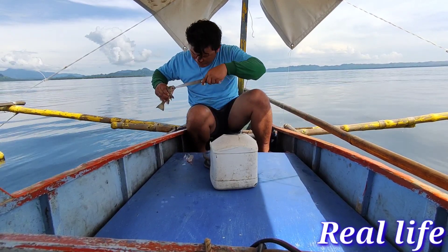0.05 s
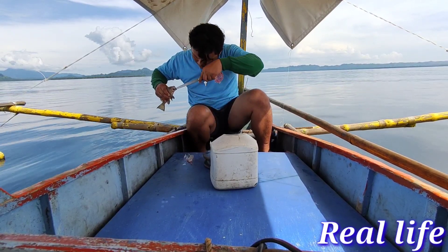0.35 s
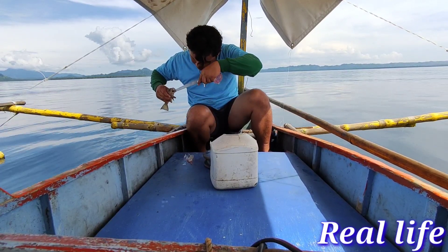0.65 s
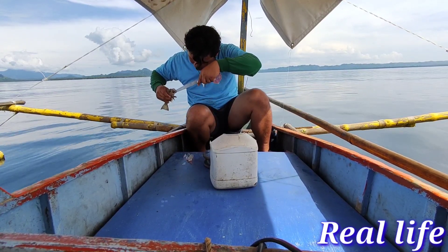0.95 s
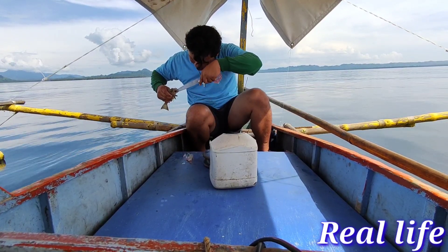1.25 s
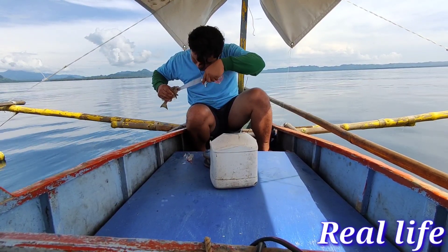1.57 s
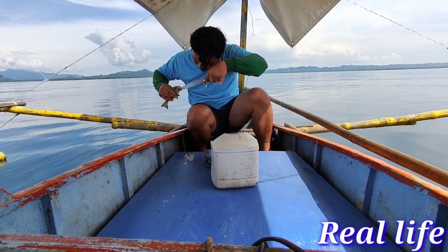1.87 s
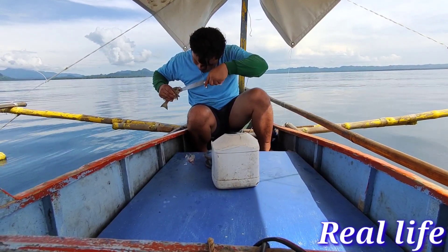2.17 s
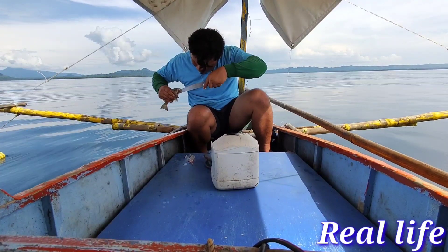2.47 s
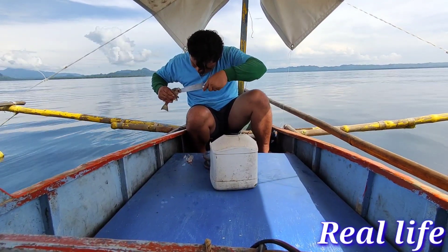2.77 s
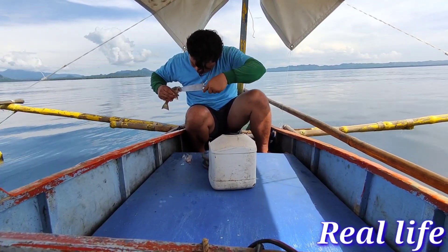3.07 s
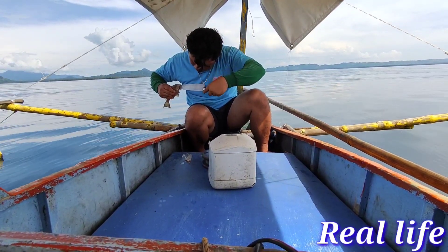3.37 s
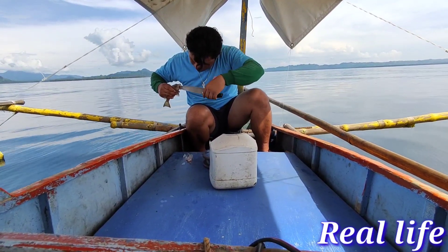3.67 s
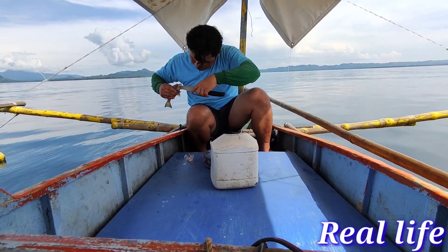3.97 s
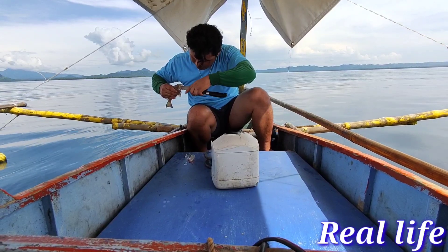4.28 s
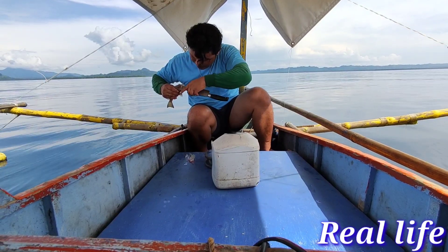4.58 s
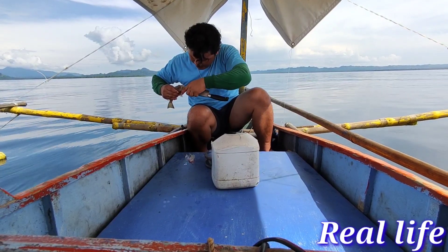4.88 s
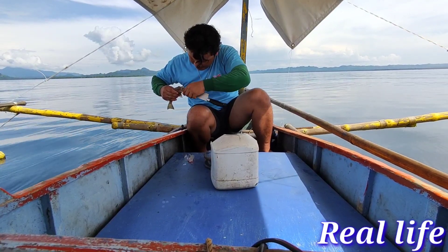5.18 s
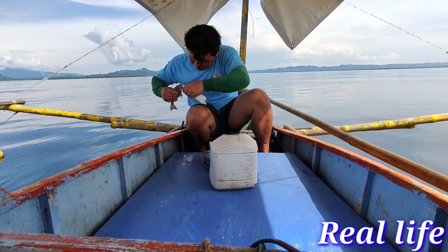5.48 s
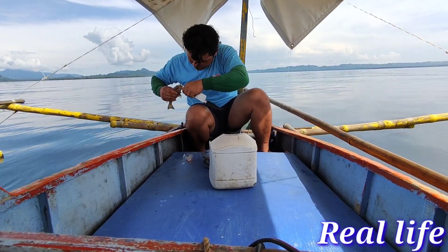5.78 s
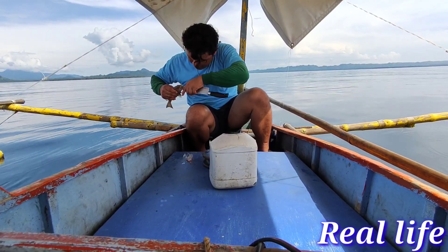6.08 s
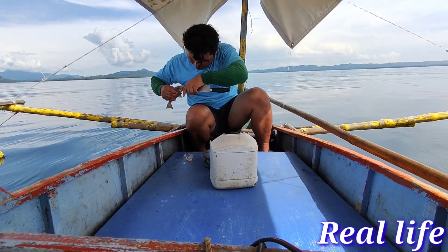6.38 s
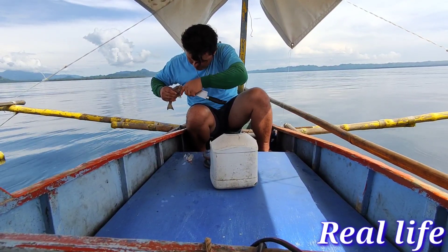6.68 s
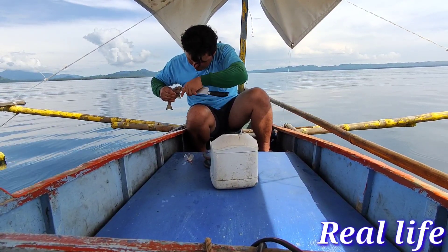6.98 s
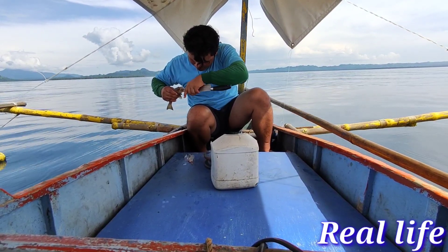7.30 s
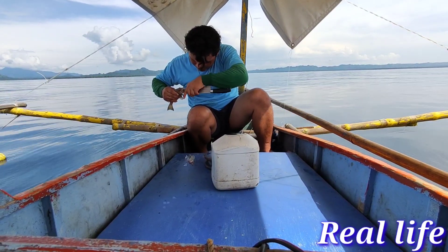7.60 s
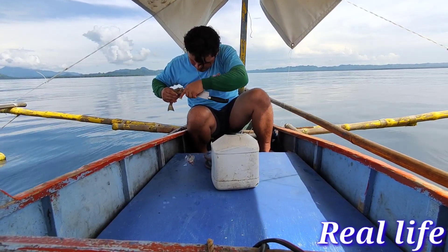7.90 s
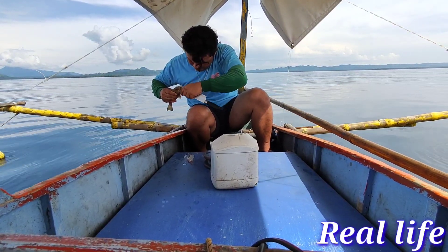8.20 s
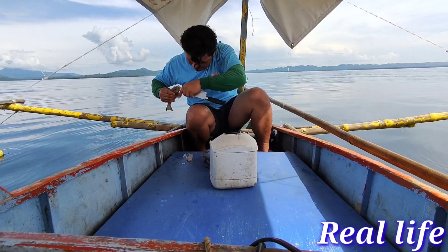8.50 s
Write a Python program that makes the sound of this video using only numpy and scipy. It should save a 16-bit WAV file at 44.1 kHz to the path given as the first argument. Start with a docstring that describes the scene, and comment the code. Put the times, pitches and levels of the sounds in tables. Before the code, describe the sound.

Light steel clicks and short, crackly scrapes come from a knife prising a hook out of a fish, with faint wet rubs of skin. Underneath, ripples pat a wooden hull and trapped air gurgles. A few dull wooden knocks sound early, then come thick and uneven in the second half, following the sharpest click. The microphone sits in the small boat, drifting on calm open water.

```python
"""Faint scratches and clicks of steel over lapping water: a fisherman prises a hook from a small fish
with a knife, on an outrigger boat adrift in a calm. The blade slips and drags on bone, rubs wet skin
and rings with the hook. Loose wood knocks dully on the hull and rings its planks. Ripples lap under
the boards; trapped air gurgles and wavelets break into tiny bubbles."""
import sys
import numpy as np
from scipy import signal
from scipy.fft import rfft, irfft, next_fast_len
from scipy.io import wavfile

SR = 44100
rng = np.random.default_rng(int(sys.argv[2]) if len(sys.argv) > 2 else 0)


def file_out(sig):
    """Save sig as 16-bit WAV at sys.argv[1]."""
    # one column per channel
    cols = np.atleast_2d(sig).T
    # limit, then scale
    lim = np.clip(cols, -1, 1)
    pcm = np.round(lim * 32767).astype(np.int16)
    wavfile.write(sys.argv[1], SR, pcm)


N = 381465
T = np.arange(N) / SR

# Table levels are relative. Spectra: (frequency [Hz], density [dB]).
FAR_HISS_SPECTRUM = [(300, -9.5), (700, 7.5), (1500, 3), (2500, -2), (4500, -3.5), (6500, -12), (7600, -27),
                     (9500, -13.5), (12000, -8), (14500, -8), (16000, -22.5)]  # far water and air
LAP_SPECTRUM = [(25, -38), (45, -18), (70, 1.5), (100, 4), (135, 9), (190, 0), (225, 0.5), (300, 1),
                (420, -7.5), (520, -16), (900, -25), (2000, -39.5)]  # ripples on the hull
HULL_SPECTRUM = [(60, -28), (135, 5), (190, -14), (260, 6), (500, 7.5), (1100, 2), (1700, 1.5),
                 (2000, -4.5), (2800, -13), (4500, -12)]  # dense, fast-dying part of the hull's ring
STEEL_SPECTRUM = [(2000, -32), (7200, -42), (8000, -8.5), (9600, 0), (10300, -10.5), (11500, 0.5),
                  (13700, -6), (15000, -13), (15600, -40)]  # hiss of steel
BONE_SPECTRUM = [(500, 5), (1500, -2), (2300, 1), (3900, -2.5), (4300, 2), (4800, -2.5), (6500, 0),
                 (7100, -6), (12000, -7)]  # cracking bone
# stereo width: (frequency [Hz], side minus mid [dB])
STEREO_WIDTH = [(30, 3), (70, -5.5), (140, -10), (280, -7.5), (550, -1.5), (1100, 0), (2200, 0)]
# ripple strength under the boards: (time [s], level [dB])
LAPPING = [(0.0, -69), (2.9, -72.5), (3.25, -62), (4.7, -63), (5.35, -66), (5.7, -43.5), (6.1, -62),
           (6.5, -61.5), (7.0, -56), (7.3, -60), (7.68, -51), (7.88, -63), (8.05, -49), (8.17, -66),
           (8.65, -50.5)]
# hull cavity: (frequency [Hz], bandwidth [Hz], level [dB])
HOLLOW_MODES = [(137.3, 5.1, -5.5), (190.4, 6.4, 3.5), (265, 26.5, -8), (305, 4.8, 2), (423.3, 3.55, -3.5)]
# breaking wavelets: (time [s], level [dB], centre [Hz])
PLIPS = [(0.757, -58.5, 817), (1.095, -61.5, 1000), (4.455, -61, 940)]
# air pockets: (time [s], level [dB], start pitch [Hz], glide [octaves/s], t60 [s])
GULPS = [(0.608, -37, 304, 1.5, 0.24), (0.619, -45.5, 106.5, 1.5, 0.47), (1.734, -44, 779, 0.5, 0.064),
         (2.15, -40.5, 124, -17, 0.13), (5.877, -36.5, 740, 41, 0.054)]
# hull planks: (frequency [Hz], level [dB], t60 [s])
HULL_MODES = [(259, 5.5, 0.089), (293, 0, 0.13), (397, -4.5, 0.19), (467.2, -5, 0.12), (590, -7, 0.083),
              (668, -18, 0.15), (783.8, -3, 0.12), (859, -21, 0.17), (1014, -13, 0.17), (1085, -3.5, 0.11),
              (1180, -9.5, 0.05), (1255, -16.5, 0.038), (1410, -16.5, 0.12), (1456, -7, 0.034),
              (1565, -5, 0.091), (1717, -7.5, 0.1), (1783, -16, 0.11)]
# loose wood on the hull, harder = higher corner: (time [s], level [dB], corner [Hz])
KNOCKS = [(0.602, -48.5, 1340), (1.731, -41, 500), (3.028, -38.5, 905), (3.109, -47.5, 720),
          (3.168, -53.5, 540), (3.258, -51.5, 398), (3.354, -39.5, 1320), (5.432, -42.5, 960),
          (5.575, -29, 2500), (5.641, -40, 870), (5.679, -43.5, 1610), (5.711, -50.5, 680),
          (5.777, -46.5, 890), (5.93, -47.5, 427), (6.003, -48.5, 484), (6.017, -41.5, 427),
          (6.035, -43, 1800), (6.056, -46, 610), (6.193, -31.5, 1820), (6.339, -44, 850), (6.857, -41, 700),
          (6.913, -44, 706), (6.963, -50.5, 1050), (7.106, -41.5, 786), (7.387, -52.5, 600),
          (7.414, -39.5, 1150), (7.528, -39.5, 1380), (7.584, -44, 790), (7.612, -45.5, 1060),
          (7.637, -39, 1530), (7.67, -49, 680), (7.71, -49.5, 670), (7.795, -50.5, 560), (7.928, -48, 940),
          (7.956, -45, 1060), (8.012, -43.5, 720), (8.059, -43.5, 900), (8.227, -47.5, 490),
          (8.304, -45, 750), (8.333, -35, 1820), (8.424, -47.5, 380), (8.596, -37, 900)]
# high ring of blade and hook: (frequency [Hz], bandwidth [Hz], level [dB])
STEEL_MODES = [(9450, 140, -4.5), (11040, 300, 0), (11580, 150, 1), (12050, 150, -9), (12140, 160, -9.5),
               (12700, 130, -1), (14800, 130, -3)]
# low ring of the blade: (frequency [Hz], level [dB], t60 [s])
BLADE_MODES = [(2032, -6.5, 0.048), (4260, -1, 0.05)]
# pan of the knife: (frequency [Hz], left minus right [dB])
STEEL_BALANCE = [(5000, 0), (8500, 2), (9600, 10.5), (10900, -10), (13100, -12.5), (14500, 4)]
# wet skin on steel, plus a short broad rustle at 8.24 s: (time [s], level [dB], length [s], centre [Hz],
# bandwidth [Hz])
RUBS = [(0.541, -71, 0.015, 4960, 890), (3.241, -70, 0.013, 2960, 400), (3.8, -67, 0.035, 2590, 600),
        (3.936, -68.5, 0.046, 2570, 600), (4.354, -66, 0.14, 4260, 2620), (4.677, -73.5, 0.16, 2800, 900),
        (5.914, -61, 0.008, 4100, 900), (6.357, -83, 0.13, 3600, 2000), (6.515, -77.5, 0.22, 3880, 2000),
        (8.163, -67, 0.09, 4730, 2100), (8.243, -62, 0.01, 1970, 2000), (8.26, -66, 0.032, 4200, 700)]
# blade drags: (time [s], level [dB], length [s], bone rasp [dB])
SCRATCHES = [(0.136, -58.5, 0.11, 2), (0.663, -57.5, 0.065, 1), (1.37, -60.5, 0.062, 3),
             (2.128, -54.5, 0.061, 0), (2.367, -62, 0.14, 0), (3.792, -42, 0.028, -1),
             (3.929, -41, 0.042, -4.5), (4.038, -55, 0.029, 2), (4.2, -49, 0.03, -1.5),
             (4.564, -50, 0.019, -1), (4.666, -52.5, 0.1, -8), (4.949, -58.5, 0.08, -4),
             (5.541, -56, 0.071, 4), (6.159, -57, 0.094, 5), (6.732, -57.5, 0.029, -3),
             (7.034, -55.5, 0.084, 2), (7.533, -64, 0.14, -5), (7.751, -57.5, 0.11, 5),
             (8.301, -59, 0.045, 12), (8.559, -58, 0.056, 5)]
# steel slipping off bone and hook: (time [s], level [dB], bone crack [dB])
CLICKS = [(0.223, -44.5, -12), (0.29, -52, 4), (0.787, -49, -1), (2.132, -54.5, 6), (2.284, -42, -5),
          (2.416, -51.5, -8), (2.601, -48.5, 2.5), (3.341, -44, -2.5), (3.608, -51.5, 3.5),
          (3.812, -45, -1), (3.933, -43, -4), (3.968, -44, 1), (4.066, -40.5, -6.5), (4.219, -43.5, -6),
          (4.354, -40, -11), (4.572, -46, 1), (4.673, -36.5, -8.5), (4.683, -51, -19), (4.709, -45, -8),
          (4.774, -32.5, -6), (4.792, -44, -2), (5.42, -42.5, 4), (5.523, -27.5, -1.5), (6.296, -48.5, 3),
          (6.765, -55, -1), (7.114, -50.5, -5), (7.79, -44.5, -3), (7.898, -46, -2), (8.293, -34, -0.5)]


def from_db(db):
    """Decibels to gain."""
    return 10 ** (np.asarray(db) / 20)


def unit_rms(x):
    """Scale to unit power."""
    return x / np.sqrt(np.mean(x ** 2) + 1e-20)


def tint(x, points):
    """Filter by a curve of (frequency [Hz], gain [dB])."""
    hz, db = np.transpose(points)
    size = next_fast_len(x.shape[-1])
    bins_hz = np.maximum(np.fft.rfftfreq(size, 1 / SR), 1)
    gain = from_db(np.interp(np.log(bins_hz), np.log(hz), db))
    return irfft(rfft(x, size) * gain, size)[..., :x.shape[-1]]


def butter(x, order, corner_hz, kind="low"):
    """Butterworth filter."""
    return signal.sosfilt(signal.butter(order, corner_hz, kind, fs=SR, output="sos"), x)


def stereo_noise(size=N):
    """Near-white noise, narrow in the upper bass, uncorrelated in the treble."""
    mid, side = rng.standard_normal((2, size))
    return unit_rms(mid + tint(side, STEREO_WIDTH) * np.array([[1], [-1]]))


def drift(rate_hz, size=N):
    """Smooth random curve, unit RMS."""
    steps = rng.standard_normal(size // 8)
    return unit_rms(np.interp(T[:size] * rate_hz, np.arange(len(steps)), steps))


def resonate(x, modes):
    """Parallel resonators: (frequency [Hz], bandwidth [Hz], level [dB])."""
    out = 0
    for hz, width_hz, db in modes:
        r = np.exp(-np.pi * width_hz / SR)
        feedback = [1, -2 * r * np.cos(2 * np.pi * hz / SR), r * r]
        out = out + from_db(db) * (1 - r * r) / 2 * signal.lfilter([1, 0, -1], feedback, x)
    return out


def band(x, hz, width_hz):
    """Two equal resonators in series, unit RMS."""
    mode = [(hz, width_hz, 0)]
    return unit_rms(resonate(resonate(x, mode), mode))


def uneven(x, spread_db=4.5, spacing_hz=210):
    """Random resonances of one contact spot."""
    hz = np.arange(1, 100) * spacing_hz
    db = spread_db * np.clip(rng.standard_normal(len(hz)), -2, 2)
    return tint(x, np.transpose([hz, db])) / np.sqrt(np.mean(from_db(2 * db)))


def add(out, time_s, sound):
    """Mix in at time_s."""
    at = int(np.clip(round(time_s * SR), 0, N - 1))
    out[..., at:at + sound.shape[-1]] += sound[..., :N - at]


def water(wash_db=-59.0, hollow_db=-61.5, hiss_db=-71.0, follow=0.1, slosh_hz=480):
    """Ripples pat the hull, hum in its hollow and slosh the planks into ringing, over a far hiss."""
    lapping_db = np.interp(T, *np.transpose(LAPPING))
    wash = unit_rms(tint(stereo_noise(), LAP_SPECTRUM) * from_db(1.5 * drift(25)))
    hollow = unit_rms(resonate(stereo_noise() * from_db(1.5 * drift(30)), HOLLOW_MODES))
    slosh = butter(stereo_noise() * from_db(3.0 * drift(45)), 2, slosh_hz)
    plank_modes = [(hz, np.log(1000) / (np.pi * t60_s), db) for hz, db, t60_s in HULL_MODES]
    planks = unit_rms(resonate(slosh, plank_modes))
    swell = from_db(follow * (lapping_db - lapping_db.mean()))
    ripples = swell * (from_db(wash_db) * wash + from_db(hollow_db) * hollow)
    hiss = unit_rms(tint(stereo_noise(), FAR_HISS_SPECTRUM))
    return ripples + from_db(lapping_db) * planks + from_db(hiss_db) * hiss


def plips(count=7, spread_s=0.026, spread_octaves=0.39, t60_cycles=16.0, rise_per_s=3.8):
    """Wavelets break into tiny bubbles, each ringing briefly with rising pitch."""
    out, t = np.zeros(N), T[:SR // 10]
    for time_s, db, centre_hz in PLIPS:
        for lag, detune in zip(rng.random(count), rng.standard_normal(count)):
            hz = centre_hz * 2 ** (spread_octaves * detune)
            chirp = np.sin(2 * np.pi * hz * t * (1 + rise_per_s * t / 2))
            add(out, time_s + spread_s * lag, from_db(db - 60 * t * hz / t60_cycles) * chirp)
    return out


def gulps(glide_s=0.035, rise_s=0.0049, rough_db=3.5, wobble_octaves=0.069):
    """Trapped air pockets ring unsteadily and glide in pitch."""
    out, t = np.zeros(N), T[:SR // 4]
    for time_s, db, start_hz, octaves_per_s, t60_s in GULPS:
        unrest = drift(138.4)[:len(t)]
        hz = start_hz * 2 ** (octaves_per_s * np.minimum(t, glide_s) + wobble_octaves * unrest)
        envelope = from_db(db + rough_db * unrest - 60 * t / t60_s) * (1 - np.exp(-(t / rise_s) ** 2))
        add(out, time_s, envelope * np.sin(2 * np.pi * np.cumsum(hz) / SR))
    return out


def plank_rings(t, rise_cycles=2.58, width_db=-8.0, right_lead_s=0.00006, low_cut_hz=195):
    """Bending waves, highs first, lows swelling after; axes (side, mode, sample)."""
    hz, db, t60_s = np.transpose(HULL_MODES)[:, :, None]
    rise_s = rise_cycles / hz
    envelope = (1 - np.exp(-(t / rise_s) ** 4)) * from_db(db - 60 * np.maximum(t - rise_s, 0) / t60_s)
    skew_rad = np.arctan(from_db(width_db + np.interp(hz, *np.transpose(STEREO_WIDTH))))
    sign = np.where(np.arange(len(hz)) % 2, -1, 1)[:, None]
    phase_rad = [2 * np.pi * hz * (t - side * right_lead_s / 2) - side * sign * skew_rad
                 for side in (1, -1)]
    # small planks radiate little below their lowest mode
    return butter(sign * envelope * np.sin(phase_rad), 2, low_cut_hz, "high")


def hull_knocks(rise_s=0.00035, hold_s=0.014, dense_t60_s=0.09, tail_db=-32, tail_t60_s=0.34,
                vary_db=2.0, hard_hz=1700, edge_db=-27, edge_t60_s=0.092):
    """Loose wood rings the hull; harder contacts are brighter, with a short, splashy edge."""
    out, t = np.zeros((2, N)), T[:SR // 3]
    rings = plank_rings(t)
    # echoes between the boat's sides sustain the dense ring for hold_s
    held = from_db(-60 * np.maximum(t - hold_s, 0) / dense_t60_s)
    tail = from_db(tail_db - 60 * t / tail_t60_s)
    dense_envelope = (1 - np.exp(-(t / rise_s) ** 2)) * (held + tail)
    for time_s, db, corner_hz in KNOCKS:
        mode_gains = from_db(vary_db * rng.standard_normal(len(HULL_MODES)))
        dense = unit_rms(tint(stereo_noise(len(t)), HULL_SPECTRUM)) * dense_envelope
        body = butter(mode_gains @ rings + dense, 3, corner_hz)
        edge = band(uneven(stereo_noise(len(t))), hz=3400, width_hz=2200)
        edge *= from_db(edge_db - 60 * t / edge_t60_s) * (corner_hz / hard_hz) ** 0.91
        add(out, time_s, from_db(db) * (body + edge))
    return out


def fingers(level_db=-81, bone_db=-14.0, patchy_db=7.5):
    """Restless grip on the fish: faint, uneven crackle."""
    grit = tint(stereo_noise(), STEEL_SPECTRUM) + from_db(bone_db) * tint(stereo_noise(), BONE_SPECTRUM)
    patches = from_db(patchy_db * (np.tanh(drift(22)) + 2 * np.tanh(drift(260))))
    return from_db(level_db) * unit_rms(grit * patches)


def stroke(length_s, ramp_s):
    """Envelope of one drag, ramped at both ends."""
    t = T[:SR // 3]
    return np.clip(t / ramp_s, 0, 1) * np.clip((length_s + ramp_s - t) / ramp_s, 0, 1)


def sliding_noise(size, shift_hz=30):
    """Friction whose resonances shift as the contact slides between spots."""
    mix_rad = np.pi * drift(shift_hz, size) / 2
    return np.cos(mix_rad) * uneven(stereo_noise(size)) + np.sin(mix_rad) * uneven(stereo_noise(size))


def stick_slip(size, rate_hz, spread_db=4.0, slip_s=0.0012, smooth_share=0.22):
    """Power of a drag that catches at random and lets go in tiny bursts; mean 1."""
    jerks = (rng.random(size) < rate_hz / SR) * from_db(2 * spread_db * np.tanh(rng.standard_normal(size)))
    power = signal.lfilter([1], [1, -np.exp(-1 / (slip_s * SR))], jerks + 1e-18)
    return smooth_share + (1 - smooth_share) * power / power.mean()


def skin_rubs(blade_db=-6.5, ease_db=8.5):
    """Wet skin on steel: a gritty, half-pitched rasp that eases off; the blade sings faintly along."""
    out = np.zeros((2, N))
    for time_s, db, length_s, hz, width_hz in RUBS:
        envelope = stroke(length_s, ramp_s=0.0023)
        size = len(envelope)
        envelope *= from_db(ease_db * (0.5 - np.minimum(T[:size] / length_s, 2)))
        envelope *= np.sqrt(stick_slip(size, rate_hz=600))
        friction = sliding_noise(size)
        blade = from_db(blade_db) * unit_rms(resonate(friction, STEEL_MODES))
        add(out, time_s, from_db(db) * envelope * (band(friction, hz, width_hz) + blade))
    return out


def scattered_friction(power, echo_db=-2.5, echo_t60_s=0.16):
    """Friction of a given power plus short scatter off the deck."""
    fade = from_db(-120 / (echo_t60_s * SR))
    echo_power = from_db(2 * echo_db) * signal.lfilter([1 - fade], [1, -fade], power + 1e-18)
    return sliding_noise(len(power)) * np.sqrt(power + echo_power)


def bite(power, crack_db, ring_db=2.0, bone_db=-5.5):
    """One contact of the edge: steel hisses and rings, bone rasps."""
    hiss = tint(scattered_friction(power), STEEL_SPECTRUM)
    ring = resonate(scattered_friction(power), STEEL_MODES)
    bone = tint(scattered_friction(power), BONE_SPECTRUM)
    return hiss + from_db(ring_db) * ring + from_db(bone_db + crack_db) * bone


def blade_ring(vary_db=6.0):
    """Free low ring of the blade; mode levels vary per strike."""
    hz, db, t60_s = np.transpose(BLADE_MODES)[:, :, None]
    t = T[:SR // 6]
    phase_rad = rng.uniform(0, 2 * np.pi, (2, len(hz), 1))
    envelope = from_db(db + vary_db * rng.standard_normal(hz.shape) - 60 * t / t60_s)
    return np.sum(envelope * np.sin(2 * np.pi * hz * t + phase_rad), axis=1)


def knife(click_db=-3.0, rise_s=0.0013, hold_s=0.0031, t60_s=0.024, blade_db=-14.5, blade_slope=0.36,
          hard_db=-30, scratch_db=-4.5, hard_catch_hz=700):
    """Snaps and gritty drags crack the bone; harder snaps wake more of the blade's low ring."""
    out, t = np.zeros((2, N)), T[:SR // 5]
    for time_s, db, crack_db in CLICKS:
        decay_db = 60 * np.maximum(t - hold_s, 0) / t60_s
        burst = np.minimum(t / rise_s, 1) * from_db(db + click_db - decay_db)
        add(out, time_s, bite(burst ** 2, crack_db))
        ring_db = db + crack_db + blade_db + blade_slope * (db - hard_db)
        add(out, time_s, from_db(ring_db) * blade_ring())
    for time_s, db, length_s, rasp_db in SCRATCHES:
        drag = from_db(db + scratch_db) * stroke(length_s, ramp_s=0.0031)
        # light drags crackle from scale to scale, hard ones rasp
        catch_hz = hard_catch_hz * np.sqrt(from_db(db - hard_db))
        add(out, time_s, bite(drag ** 2 * stick_slip(len(drag), catch_hz), rasp_db))
    return np.array([tint(channel, [(hz, side * db / 2) for hz, db in STEEL_BALANCE])
                     for channel, side in zip(out, (1, -1))])


def scene():
    """Boat and water in open air, stereo."""
    return hull_knocks() + knife() + fingers() + skin_rubs() + gulps() + plips() + water()


def record(dry):
    """Steep low-pass on the top treble."""
    cutoff_hz = 15400
    return signal.sosfilt(signal.ellip(10, .2, 70, cutoff_hz, fs=SR, output="sos"), dry)


dry = scene()
out = record(dry)
file_out(out)
```